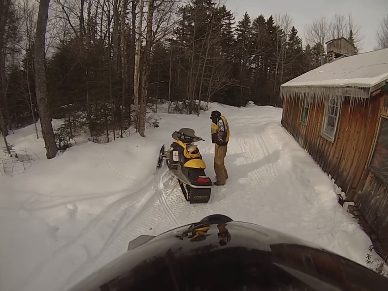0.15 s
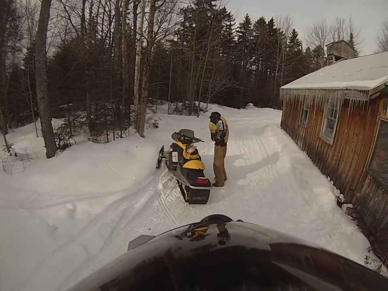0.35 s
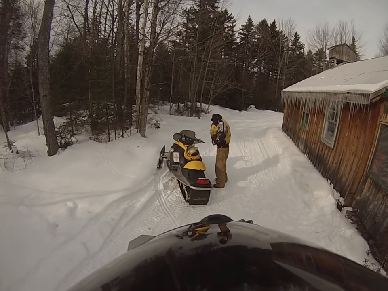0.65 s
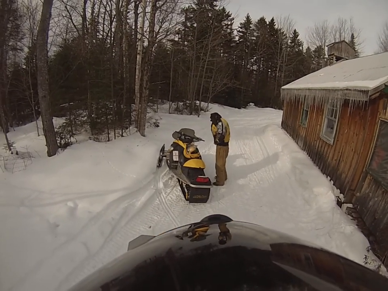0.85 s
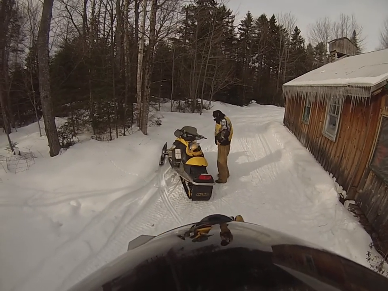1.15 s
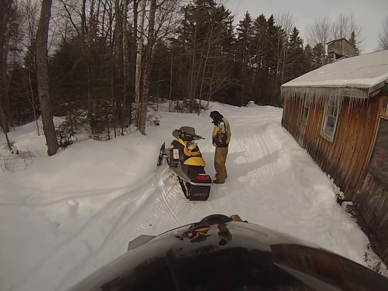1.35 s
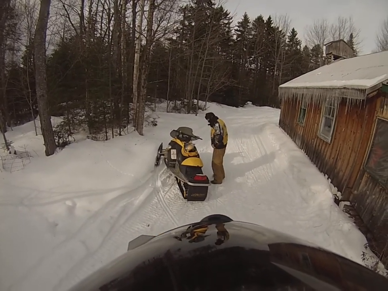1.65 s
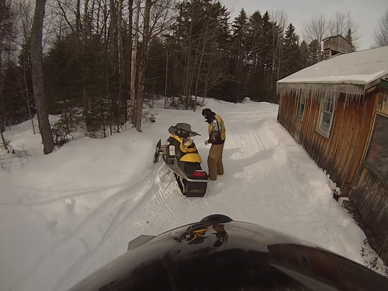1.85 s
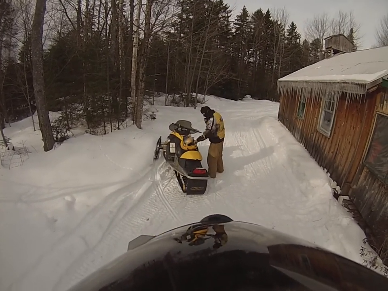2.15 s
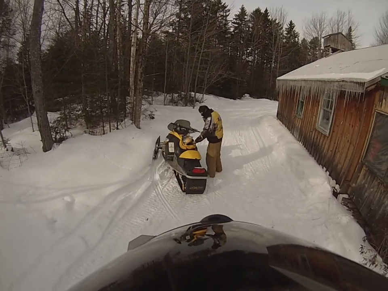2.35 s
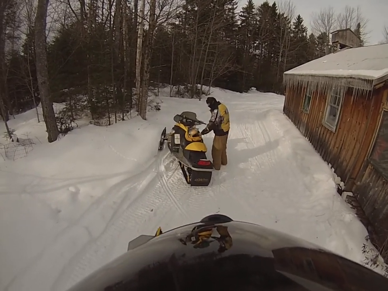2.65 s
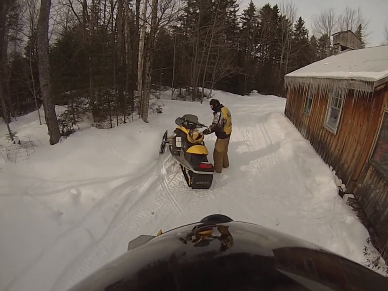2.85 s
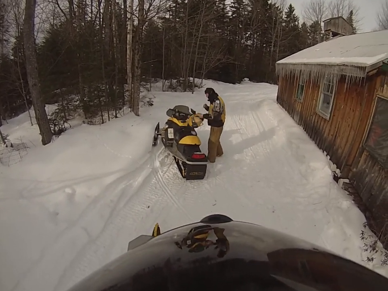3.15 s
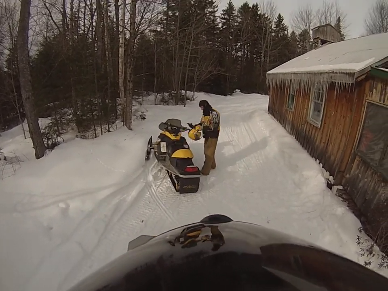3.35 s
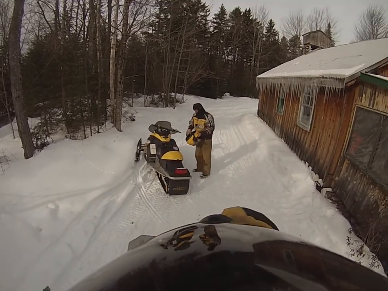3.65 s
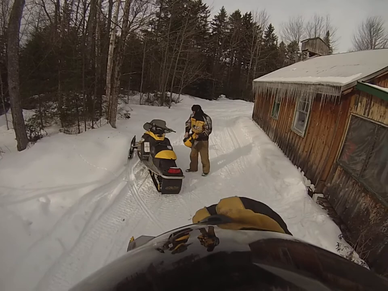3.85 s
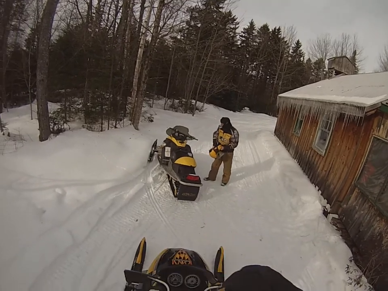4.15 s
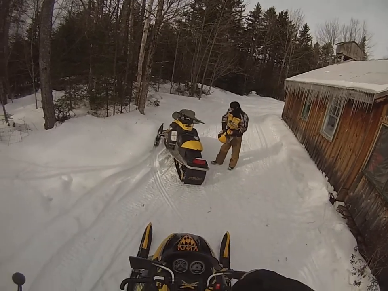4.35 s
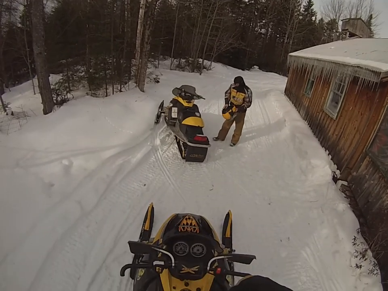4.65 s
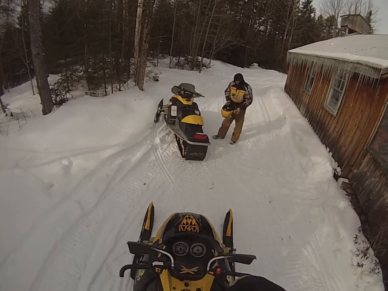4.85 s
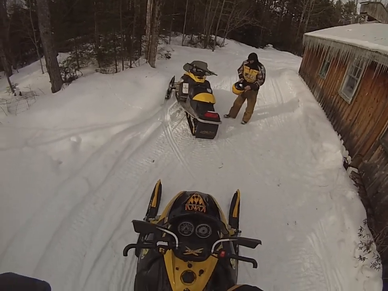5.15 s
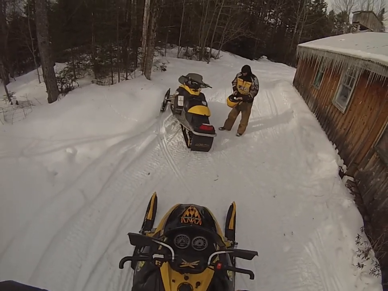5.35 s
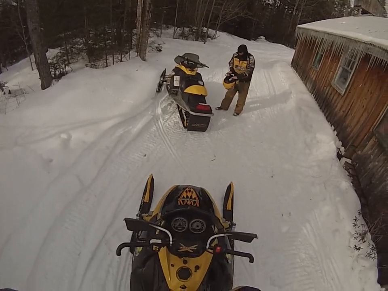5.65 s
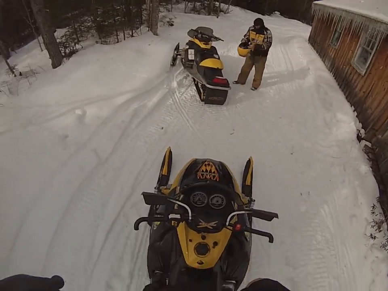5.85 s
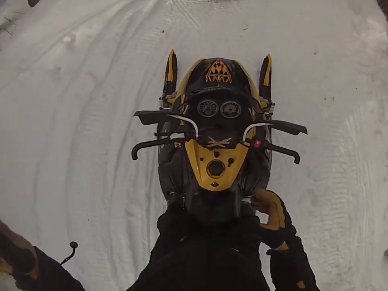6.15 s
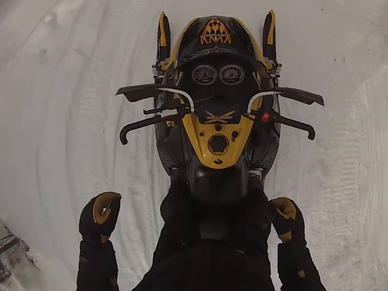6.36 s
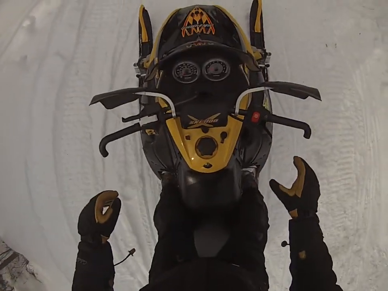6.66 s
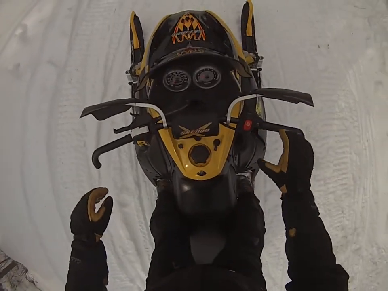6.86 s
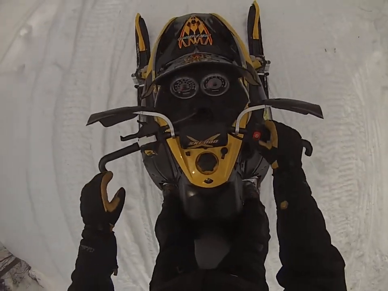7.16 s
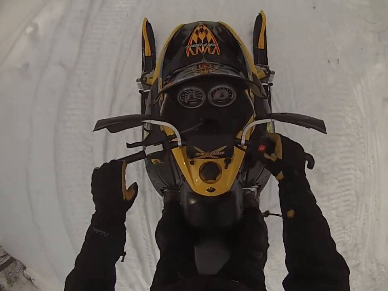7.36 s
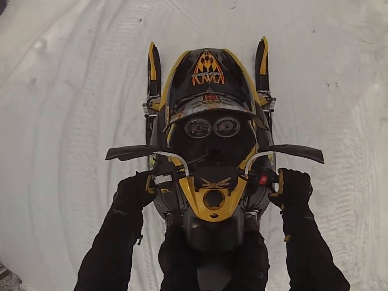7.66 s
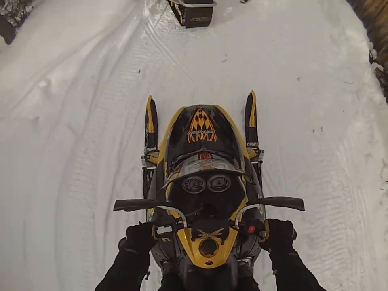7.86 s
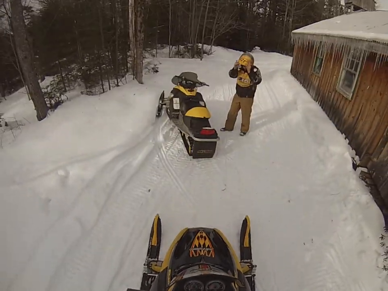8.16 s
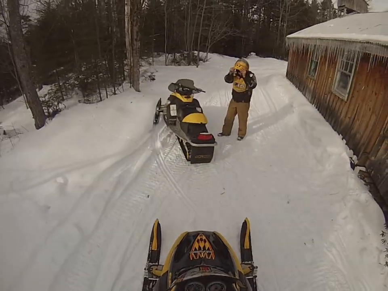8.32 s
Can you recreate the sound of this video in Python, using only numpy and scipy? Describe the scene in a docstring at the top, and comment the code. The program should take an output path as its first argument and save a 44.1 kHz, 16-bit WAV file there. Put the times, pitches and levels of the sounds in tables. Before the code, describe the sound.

A two-stroke snowmobile idles unevenly outdoors, humming and burbling softly under faint sleeve swishes. Midway, a glove bumps and scrapes the helmet carrying the microphone: sharp plastic visor clicks, a brief ratchet, creaks and two very loud booming knocks, the engine dipping after them. Then the clatter comes forward and short runs of exhaust pops bark and ring until the end.

```python
"""Snowmobile idling, heard at the helmet

A two-stroke idles: wavering tones, a burbling throb and clatter, all driven by one uneven firing clock.
A glove thumps and scrapes the helmet (ringing shell, filtered noise); the visor clicks, creaks and ratchets.
Nylon sleeves swish. As the rider looks down at the sled, short runs of exhaust pops bark and ring.
All is heard from a cased camera on the helmet; its gain ducks under the loudest peaks and recovers."""
import sys
import numpy as np
from scipy import signal
from scipy.fft import rfft, irfft, next_fast_len
from scipy.io import wavfile
from scipy.ndimage import uniform_filter1d, minimum_filter1d, map_coordinates

SR = 44100
rng = np.random.default_rng(int(sys.argv[2]) if len(sys.argv) > 2 else 0)


def int16_out(signal):
    """Quantize to a 16-bit WAV file."""
    q = np.round(np.clip(np.atleast_2d(signal).T, -1, 1) * 32767)
    wavfile.write(sys.argv[1], SR, q.astype(np.int16))


N = 374409


def amp(db):
    """Decibels to linear gain."""
    return 10 ** (np.asarray(db) / 20)


def unit(x):
    """Scaled to rms 1."""
    return x / np.sqrt(np.mean(x ** 2) + 1e-20)


def curves(rows):
    """Each column after the time, interpolated to one value per sample."""
    time_s, *columns = np.transpose(rows)
    return [np.interp(np.arange(N) / SR, time_s, column) for column in columns]


def wobble(rate_hz):
    """A smooth random curve through rate_hz normal knots a second."""
    knots = rng.standard_normal(int(N * rate_hz / SR) + 4)
    return map_coordinates(knots, [np.arange(N) * rate_hz / SR])


def through(x, response):
    """x convolved with a response, at its own length."""
    return signal.fftconvolve(x, response)[:len(x)]


def add(track, time_s, sound):
    """Mix a sound into the track at time_s."""
    part = track[round(time_s * SR):][:len(sound)]
    part += sound[:len(part)]


def swell(start_s, length_s, attack_s, release_s):
    """Envelope: exponential rise up to start_s, hold for length_s, exponential decay."""
    t = np.arange(N) / SR - start_s
    return np.exp(np.minimum(t, 0) / attack_s - np.maximum(t - length_s, 0) / release_s)


# Resonances of the camera case's air and walls: (centre [Hz], width [Hz], lift [dB])
CASE_RESONANCES = [(1460, 204, 13), (2040, 270, 5), (3710, 440, 5), (4890, 520, 8), (6610, 510, 3.5)]


def cased(spectrum, size=8192):
    """Minimum-phase impulse response of a spectrum, lifted by the case's resonances."""
    hz = np.fft.rfftfreq(size, 1 / SR)
    point_hz, point_db = np.transpose(spectrum)
    db = np.interp(np.log(hz + 1), np.log(point_hz + 1), point_db)
    for centre_hz, width_hz, lift_db in CASE_RESONANCES:
        db = db + lift_db * np.exp(-((hz - centre_hz) / width_hz) ** 2)
    # folding the cepstrum makes the response causal
    cepstrum = irfft(np.log(amp(db)))
    cepstrum[1:size // 2] *= 2
    cepstrum[size // 2 + 1:] = 0
    return irfft(np.exp(rfft(cepstrum)))[:size // 2]


def resonant(modes):
    """Impulse response of decaying modes (Hz, width Hz, dB), struck at new strengths each time."""
    t = np.arange(SR // 8) / SR
    response = 0
    for hz, width_hz, db in modes:
        ring = np.sin(2 * np.pi * hz * t) * np.exp(-np.pi * width_hz * t)
        response = response + amp(db + rng.normal(0, 1)) * width_hz * ring
    return response


def burst(response, rise_s, t60_s, kick):
    """A pressure kick and dying turbulence through a response, with peak 1."""
    t = np.arange(SR // 8) / SR
    push = rng.standard_normal(len(t)) * amp(-60 * t / t60_s) * (1 - np.exp(-t / rise_s))
    push[0] += kick
    sound = through(push, response)
    return sound / np.abs(sound).max()


# Helmet shell modes: (frequency [multiple of boom], width [share of boom], level [dB])
SHELL_MODES = [(1.001, 0.17, 12), (1.699, 0.65, -13.5), (3.3, 1, -31)]
BOOM_HZ = 98  # under pops and rubbing


def shell(rise_s, boom_hz):
    """The helmet's low ring after one push: damped modes scaled to boom_hz, with peak 1."""
    t = np.arange(SR // 3) / SR
    cycles = boom_hz * t
    ring = 0
    for multiple, width, db in SHELL_MODES:
        ring = ring + amp(db) * np.sin(2 * np.pi * multiple * cycles) * np.exp(-np.pi * width * cycles)
    ring = ring * (1 - np.exp(-t / rise_s))
    return ring / np.abs(ring).max()


# Outdoor air spectrum: (frequency [Hz], relative level [dB])
AIR_SPECTRUM = [(20, -2), (200, 7), (1000, -19), (4000, -20.5), (15000, -34.5)]


def outdoor_air():
    """Faint steady noise, mostly low."""
    return amp(-61.5) * unit(through(rng.standard_normal(N), cased(AIR_SPECTRUM)))


# Sleeve swishes as the arms move: (time [s], length [s], level [dB])
SLEEVE_SWISHES = [(1.176, 0.51, -48), (3.413, 0.73, -51), (5.9, 0.49, -55.5), (7.63, 0.016, -39),
                  (8.368, .04, -41)]
# Nylon rubbing spectrum: (frequency [Hz], relative level [dB])
NYLON_SPECTRUM = [(200, -23), (700, -5), (1250, 2.5), (1900, 4.5), (2700, -10.5), (4000, -14.5),
                  (8500, -25.5), (15000, -39)]
SWISH_ATTACK, SWISH_RELEASE = 0.18, 0.77  # shares of a movement's length


def sleeves():
    """Ribbed nylon slides on itself: a fine hiss of uneven level."""
    swish_gain = 0
    for start_s, length_s, db in SLEEVE_SWISHES:
        envelope = swell(start_s, length_s, SWISH_ATTACK * length_s, SWISH_RELEASE * length_s)
        swish_gain = swish_gain + amp(db) * envelope
    threads = rng.standard_normal(N) * amp(2.3 * wobble(90))
    return swish_gain * unit(through(threads, cased(NYLON_SPECTRUM)))


# Blows on the helmet: (time [s], boom peak level [dB])
HELMET_BLOWS = [(3.713, -17.5), (4.028, -17), (4.07, -5), (4.14, 4.5), (4.317, -18), (4.371, -14),
                (4.72, -16.5), (5.065, 15.5), (5.264, -13.5), (5.541, -7.5), (6.474, -23.5)]
THUMP_HZ = 95
OVERTONE_DB, OVERTONE_DB_PER_DB = -9, 0.3  # re boom for a 0 dB blow; growth with blow level


def helmet_thumps():
    """The glove bumps the shell; harder blows wake more of an overtone."""
    out = np.zeros(N)
    boom = shell(rise_s=0.0026, boom_hz=THUMP_HZ)
    overtone = shell(rise_s=0.0023, boom_hz=1.54 * THUMP_HZ)
    for time_s, db in HELMET_BLOWS:
        overtone_gain = amp(OVERTONE_DB + OVERTONE_DB_PER_DB * db)
        add(out, time_s, -amp(db) * (boom + overtone_gain * overtone))
    return out


# Glove strokes over the helmet: (time [s], length [s], rumble level [dB], scrape level [dB])
GLOVE_STROKES = [(3.965, 0.078, -29, -35), (4.034, 0.072, -14, -31.5), (4.255, .18, -19.5, -46.5),
                 (4.716, 0.056, -29.5, -42), (4.857, 0.16, -33.5, -50), (5.032, .14, -23.5, -48),
                 (5.812, 0.092, -36.5, -52.5)]
# Glove scrape spectrum: (frequency [Hz], relative level [dB])
SCRAPE_SPECTRUM = [(100, -9.5), (220, 9.5), (420, 7), (620, -4.5), (880, -9.5), (1150, 0.5), (1500, -2),
                   (2300, 3), (3000, -3), (3850, -5), (4200, -16), (7000, -24.5), (10000, -39.5),
                   (15000, -51)]
STROKE_ATTACK_S, STROKE_RELEASE_S = 0.022, 0.037


def glove_rub():
    """The sliding glove rumbles the shell with noise and scrapes in small slips."""
    rumble_gain, scrape_gain = np.zeros((2, N))
    for start_s, length_s, rumble_db, scrape_db in GLOVE_STROKES:
        envelope = swell(start_s, length_s, STROKE_ATTACK_S, STROKE_RELEASE_S)
        rumble_gain += amp(rumble_db) * envelope
        scrape_gain += amp(scrape_db) * envelope
    rumble = unit(through(rng.standard_normal(N), shell(rise_s=0.00043, boom_hz=BOOM_HZ)))
    slide = rng.standard_normal(N) * amp(1.2 * wobble(220))
    # seams catch about 70 times a second and let go with a crackle
    catches = unit((rng.random(N) < 70 / SR) * rng.standard_normal(N))
    scrape = unit(through(slide + 0.23 * catches, cased(SCRAPE_SPECTRUM)))
    return rumble_gain * rumble + scrape_gain * scrape


RATCHET_START_S, TOOTH_STEP_S = 4.281, .0287
TOOTH_DB, TOOTH_HZ = -35, 2900
TICK_T60_S = 0.011  # teeth and slips


def ratchet(count=7):
    """The visor's hinge steps over evenly spaced teeth: one tick for each."""
    return [(RATCHET_START_S + k * TOOTH_STEP_S, TOOTH_DB + rng.normal(0, 1.7), TOOTH_HZ, TICK_T60_S)
            for k in range(count)]


CREAK_SLIPS_PER_S, CREAK_HZ = 35, 2440  # typical values; each slip varies
CREAK_DB = 10  # mean, re the stroke's scrape level


def creaks(count=24):
    """The visor slips at an uneven rate while the glove presses on it: one tick for each slip."""
    ticks = []
    for start_s, length_s, _, scrape_db in GLOVE_STROKES:
        gap, size, pitch = rng.standard_normal((3, count))
        delays_s = np.cumsum(np.exp(0.24 * gap)) / CREAK_SLIPS_PER_S
        slip_db = scrape_db + CREAK_DB + 2.5 * size
        slip_hz = CREAK_HZ * 2 ** (0.16 * pitch)
        for delay_s, db, hz in zip(delays_s, slip_db, slip_hz):
            if delay_s < length_s:
                ticks.append((start_s + delay_s, db, hz, TICK_T60_S))
    return ticks


# Visor snaps: (time [s], level [dB], loudest resonance [Hz], t60 [s])
VISOR_CLICKS = [(3.936, -27.5, 2140, 0.0064), (4.008, -0.5, 2650, 0.0094), (4.016, -6.5, 2270, 0.021),
                (4.128, -9, 1940, 0.031), (4.133, -9, 1500, 0.036), (4.246, -16, 3500, 0.014),
                (4.308, -18, 3470, 0.018), (4.454, -26, 1400, 0.0086), (4.483, -22.5, 4830, 0.016),
                (4.5543, -20.5, 1950, 0.0087), (4.709, -16.5, 2820, 0.029), (4.724, -19, 2170, 0.0096),
                (4.919, -27, 2030, 0.044), (4.986, -23.5, 3120, 0.024), (5.031, -21.5, 2980, 0.004),
                (5.0492, -14.5, 3260, 0.0053), (5.069, 3, 960, 0.05), (5.079, 0, 2930, 0.027),
                (5.272, -22.5, 1900, 0.066), (5.321, -22, 2040, .008), (5.372, -26.5, 1490, 0.02),
                (5.539, -11.5, 1750, 0.018), (5.821, -30, 1950, 0.011), (8.1208, -25.5, 2180, 0.03),
                (8.449, -40.5, 3520, .012)]
# Plastic body spectrum: (frequency [Hz], relative level [dB])
PLASTIC_SPECTRUM = [(100, -27.5), (250, 2.5), (430, 6), (620, -9), (880, -10), (1100, -5), (1450, -3),
                    (1750, -9), (2300, -0.5), (3000, -10), (3850, -11.5), (4200, -30), (7000, -48),
                    (10000, -51), (15000, -75)]
# High snap spectrum: (frequency [Hz], relative level [dB])
SNAP_SPECTRUM = [(2000, -28), (4500, 13.5), (6500, 10), (8000, -2.5), (11000, -7), (15000, -23.5)]
SNAP_DB, SNAP_DB_PER_OCTAVE = -21, 12  # re click level for a 2 kHz contact; higher contacts snap more


def visor():
    """Stiff plastic catches and lets go in dry ticks; each contact point favours one resonance."""
    out = np.zeros(N)
    body, snap = cased(PLASTIC_SPECTRUM), cased(SNAP_SPECTRUM)
    for time_s, db, hz, t60_s in [*VISOR_CLICKS, *ratchet(), *creaks()]:
        snap_db = SNAP_DB + SNAP_DB_PER_OCTAVE * np.log2(hz / 2000)
        contact = through(body, resonant([(hz, 330, 0)]))
        add(out, time_s, amp(db + 0.5) * burst(body, rise_s=0.0008, t60_s=t60_s, kick=0.71))
        add(out, time_s, amp(db + 1) * burst(contact, rise_s=.0008, t60_s=t60_s, kick=3))
        add(out, time_s, amp(db + snap_db) * burst(snap, rise_s=0.001, t60_s=t60_s, kick=0.41))
    return out


# Runs of exhaust pops: (time [s], level of first pop [dB], pops [count])
EXHAUST_POP_RUNS = [(5.81, -59, 2), (5.946, -50.5, 2), (6.085, -44.5, 3), (6.283, -42.5, 1),
                    (6.403, -42.5, 2), (6.543, -42.5, 2), (6.747, -42.5, 1), (6.896, -42.5, 3),
                    (7.135, -46, 2), (7.342, -40, 1), (7.432, -41, 2), (7.575, -39, 2), (7.719, -40.5, 3),
                    (7.914, -42, 1), (7.987, -44.5, 4), (8.253, -47.5, 2)]
# Broad puff spectrum: (frequency [Hz], relative level [dB])
PUFF_SPECTRUM = [(150, -19), (300, 14.5), (470, 11), (600, -9), (800, -41), (1000, -15), (1250, 0),
                 (2100, -24), (3000, -23), (8000, -24), (15000, -45)]
# Exhaust can and hood, short bark: (frequency [Hz], width [Hz], level [dB])
CAN_BARK_MODES = [(416, 24, 9), (674, 130, 11), (945, 39, 19), (1036, 42, 21)]
# Exhaust can and hood, longer pipe ring: (frequency [Hz], width [Hz], level [dB])
PIPE_RING_MODES = [(1341, 21, 11.5), (1424, 17, 10.5), (1600, 12.3, 13), (1950, 240, -11)]
POP_GAP_S = .0545  # about three firings
POP_FADE_DB = .5  # loss from pop to pop
POP_BARK_DB, POP_PUFF_DB, PIPE_RING_DB, POP_BOOM_DB = 9.5, 4, 12, 11.5  # re pop level


def exhaust_pops():
    """Rich charges go off in short runs, each with a bark; the pipe rings on and the helmet booms."""
    out = np.zeros(N)
    puff, boom = cased(PUFF_SPECTRUM), shell(rise_s=0.011, boom_hz=BOOM_HZ)
    for start_s, run_db, count in EXHAUST_POP_RUNS:
        for k in range(round(count)):
            time_s, db = start_s + k * POP_GAP_S, run_db - k * POP_FADE_DB
            bark = burst(resonant(CAN_BARK_MODES), rise_s=.0015, t60_s=.025, kick=7)
            pipe_ring = burst(resonant(PIPE_RING_MODES), rise_s=0.00099, t60_s=0.14, kick=10)
            add(out, time_s, amp(db + POP_BARK_DB) * bark)
            add(out, time_s, amp(db + POP_PUFF_DB) * burst(puff, rise_s=.002, t60_s=.05, kick=0))
            add(out, time_s + .001, amp(db + PIPE_RING_DB) * pipe_ring)
            add(out, time_s, amp(db + POP_BOOM_DB) * boom)
    return out


# Exhaust tones: (multiple of firing rate, relative level ahead [dB], relative level facing sled [dB])
EXHAUST_ORDERS = [(.5, -50, -55), (1, -44, -45), (2, -45, -49), (3, -61, -62), (4, -60, -56), (5, -59, -54),
                  (6, -60, -47.5), (9, -65, -65)]
HUM_DB, HUM_WAVER_DB = -1.5, 3  # offset of all tones; rms waver of each


def exhaust_hum(phase, facing):
    """Harmonics of the firing rate, each wavering in level and balanced by where the head faces."""
    hum = np.zeros(N)
    for multiple, ahead_db, facing_db in EXHAUST_ORDERS:
        tone_db = HUM_DB + ahead_db + (facing_db - ahead_db) * facing + HUM_WAVER_DB * wobble(16)
        hum += amp(tone_db) * np.sqrt(2) * np.sin(2 * np.pi * (multiple * phase + rng.random()))
    return hum


# Head turning down to the sled and back: (time [s], facing the sled [0-1], exhaust throb level [dB])
HEAD_TURNS = [(0, 0, -42), (3.3, 0.08, -41), (3.8, 0.13, -36.5), (5.1, 0.34, -32.5), (5.6, 0.24, -36),
              (6.2, 0.63, -37.5), (7, 1, -41), (7.9, 0.76, -37.5), (8.2, 0.22, -36), (8.49, 0.34, -39)]
# Exhaust throb spectrum: (frequency [Hz], relative level [dB])
THROB_SPECTRUM = [(8, -37), (14, -25), (40, -22.5), (70, -15.5), (92, 1), (108, 1), (130, -6), (165, -13),
                  (200, -30.5), (400, -42), (1500, -86.5)]
# Clatter spectrum looking ahead: (frequency [Hz], relative level [dB])
AHEAD_SPECTRUM = [(90, -17.5), (220, 7.5), (330, 2.5), (480, 0.5), (600, -3.5), (1100, -3), (1550, -6),
                  (2000, -7.5), (2800, -15), (4000, -26), (6500, -30), (9000, -34), (15000, -39.5)]
# Clatter spectrum facing the sled: (frequency [Hz], relative level [dB])
FACING_SPECTRUM = [(120, -11), (220, 11), (340, 12), (450, 13.5), (570, -8), (680, 4), (790, -12), (960, 9),
                   (1180, -1.5), (1550, -1.5), (2100, -3), (2900, -13.5), (5000, -20.5), (15000, -39.5)]
IDLE_HZ, IDLE_WANDER = 56.1, .018  # mean firings a second; rms share by which the idle hunts
CLATTER_DB, FACING_RISE_DB = -47, 6  # looking ahead; rise when fully facing the sled


def engine():
    """Each firing pushes the exhaust, rattles the engine and rings the hood; no two burn alike."""
    rate_hz = IDLE_HZ * (1 + IDLE_WANDER * wobble(4))
    facing, throb_db = curves(HEAD_TURNS)
    facing = np.clip(facing, 0, 1)
    phase = np.cumsum(rate_hz * (1 + 0.00828 * wobble(12))) / SR
    firing = phase.astype(int)
    age_s = (phase - firing) / rate_hz
    burn, rattle, lag = rng.standard_normal((firing[-1] + 1, 3)).T
    # about one charge in eight burns rich and kicks harder
    rich = rng.random(len(burn)) < 1 / 8
    burn, rattle = .6 * burn + 2 * rich, .6 * rattle + 2 * rich

    # early and late burns (2.2 ms rms) smear the throb into a burble
    starts = np.flatnonzero(np.diff(firing, prepend=-1)) + .0022 * SR * lag
    pushes = np.bincount(np.clip(starts, 0, N - 1).astype(int), amp(3.4 * burn), N)
    throb = unit(through(pushes - pushes.mean(), cased(THROB_SPECTRUM)))

    # pistons and clutch rattle hardest just after a firing
    gate = unit(.5 + amp(1.9 * rattle)[firing] * np.exp(-age_s / 0.029))
    ahead = unit(through(gate * rng.standard_normal(N), cased(AHEAD_SPECTRUM)))
    below = unit(through(gate * rng.standard_normal(N), cased(FACING_SPECTRUM)))
    clatter = np.sqrt(1 - facing) * ahead + np.sqrt(facing) * below
    clatter_gain = amp(CLATTER_DB + FACING_RISE_DB * facing)

    hood_ring = unit(through(pushes, resonant([(1529, 15, 0)])))
    hum = exhaust_hum(phase, facing)
    return hum + amp(throb_db) * throb + clatter_gain * (clatter + amp(-12) * hood_ring)


def scene():
    """Air, jacket, helmet and visor around the sled's exhaust and engine, as one channel."""
    rider = sleeves() + helmet_thumps() + glove_rub() + visor()
    sled = exhaust_pops() + engine()
    return (outdoor_air() + rider + sled)[None]


def gain_control(x, ceiling_db, recovery_db_per_s, size=200):
    """Peaks over the ceiling pull the gain down; it climbs back steadily, smoothed over size samples."""
    over_db = np.maximum(20 * np.log10(np.abs(x) + 1e-9) - ceiling_db, 0)
    climb_db = recovery_db_per_s * np.arange(N) / SR
    gain_db = climb_db - np.maximum.accumulate(over_db + climb_db, axis=-1)
    return x * amp(uniform_filter1d(minimum_filter1d(gain_db, size), size))


TOP_HZ = 15150


def record(dry):
    """The camera's gain control, then a sharp cut above TOP_HZ."""
    held = gain_control(dry, ceiling_db=-.5, recovery_db_per_s=23)
    padded = next_fast_len(N + SR // 2)
    passband = np.fft.rfftfreq(padded, 1 / SR) < TOP_HZ
    return irfft(rfft(held, padded) * passband, padded)[:, :N]


dry = scene()
out = record(dry)
int16_out(out)
```